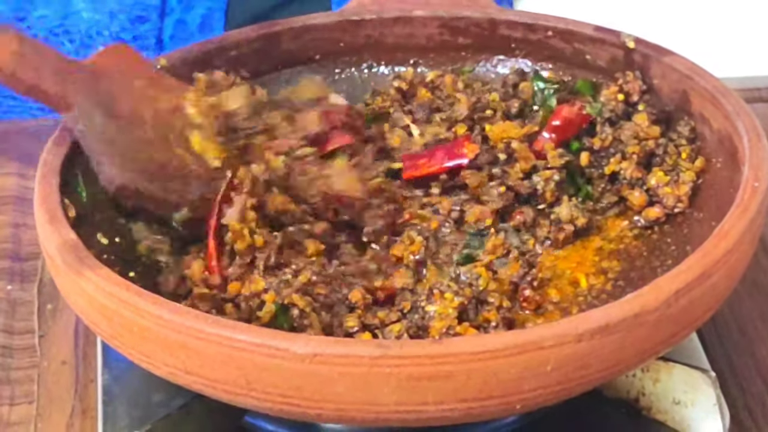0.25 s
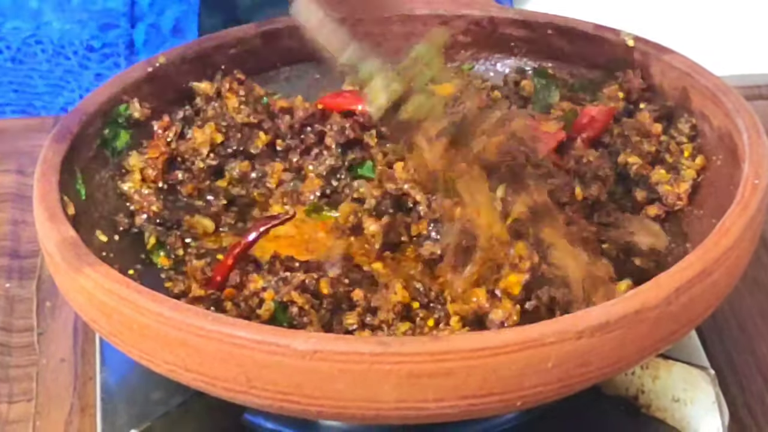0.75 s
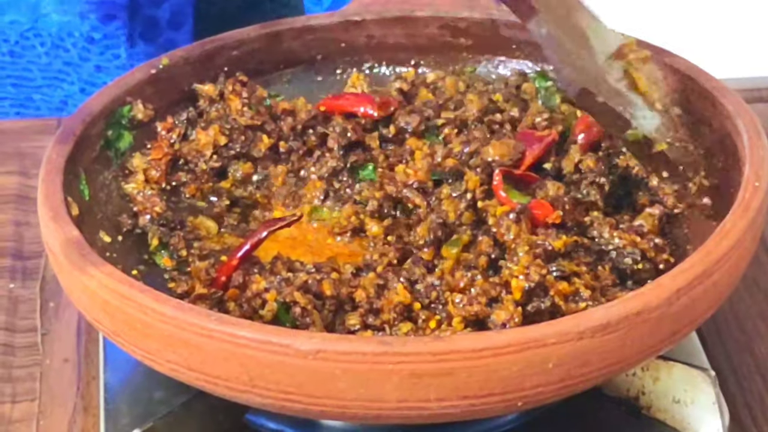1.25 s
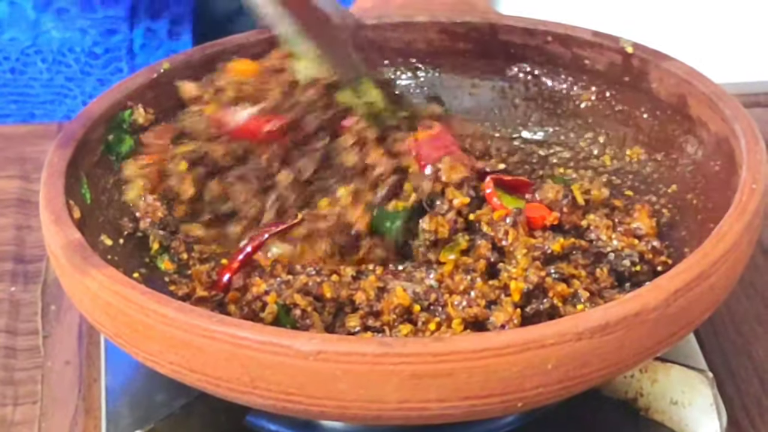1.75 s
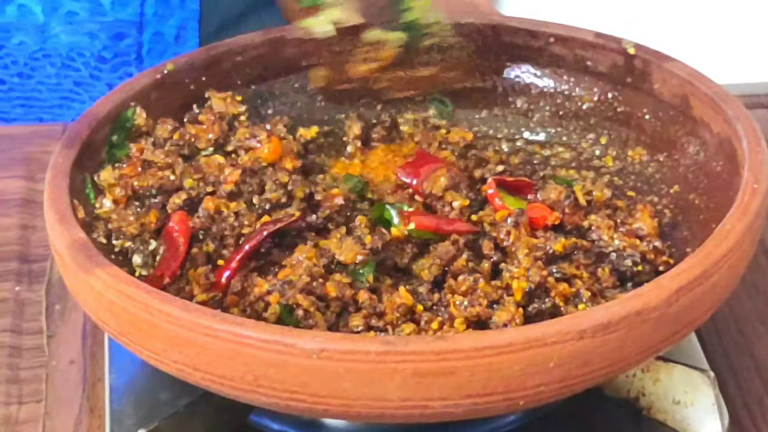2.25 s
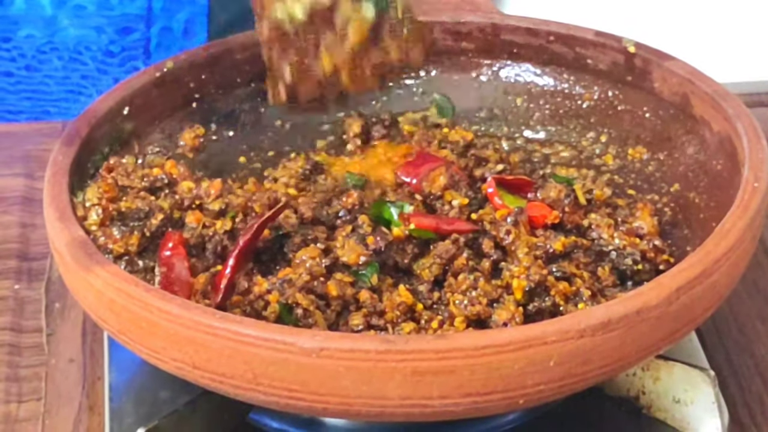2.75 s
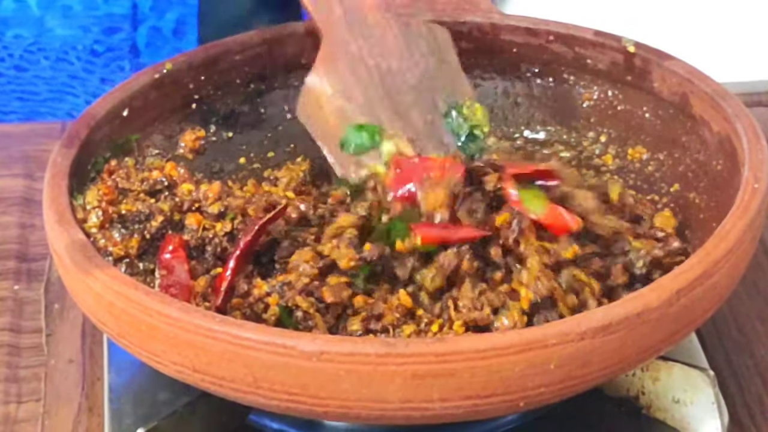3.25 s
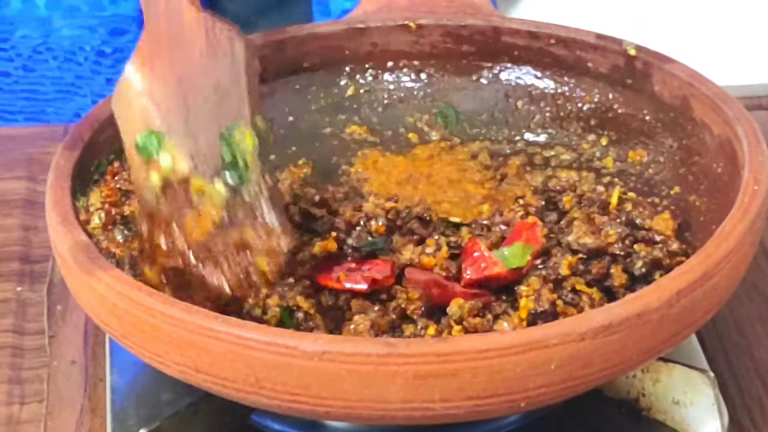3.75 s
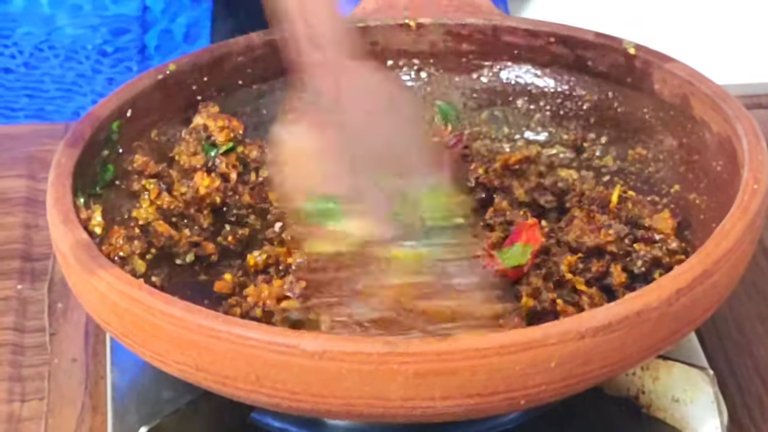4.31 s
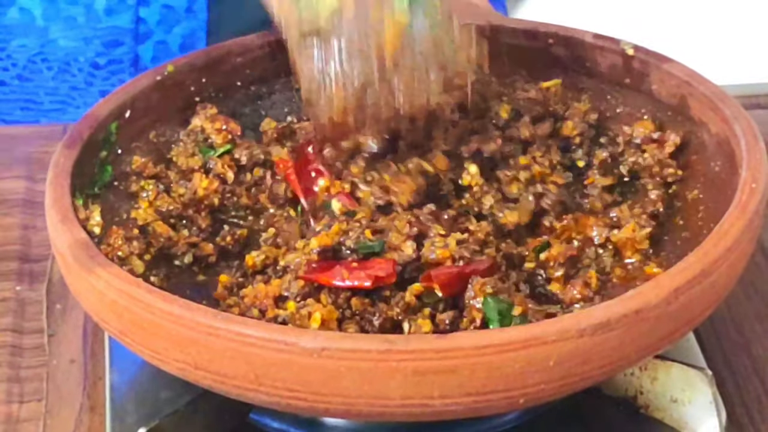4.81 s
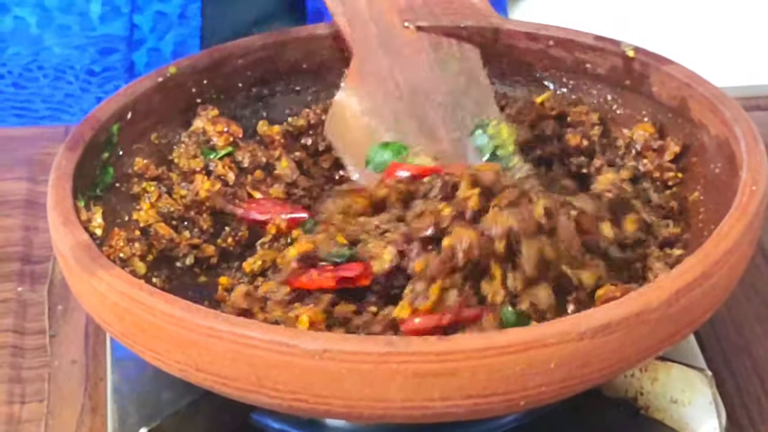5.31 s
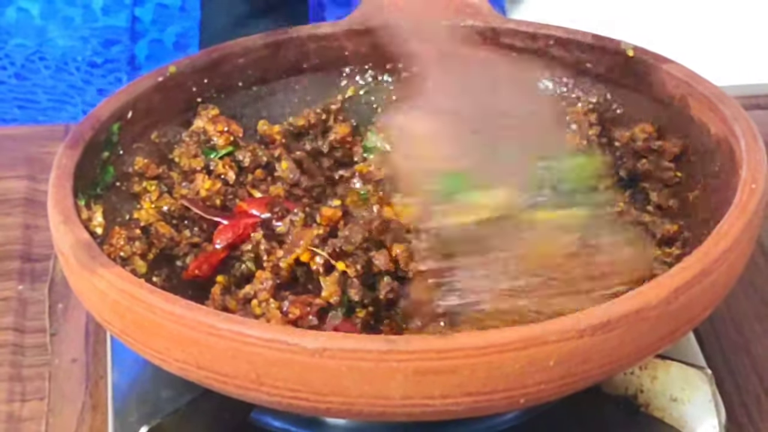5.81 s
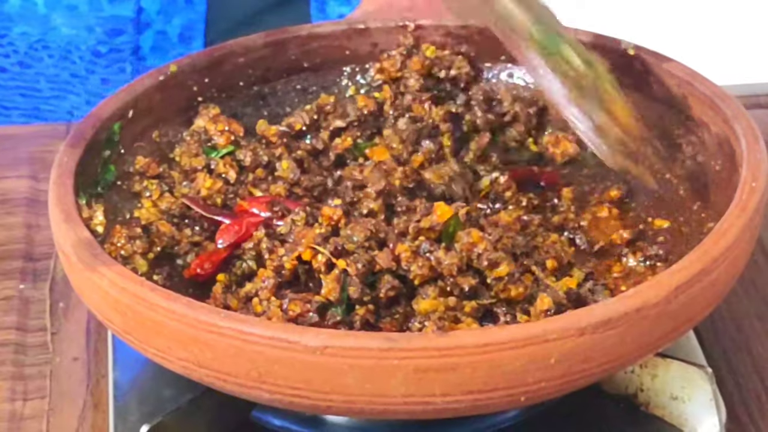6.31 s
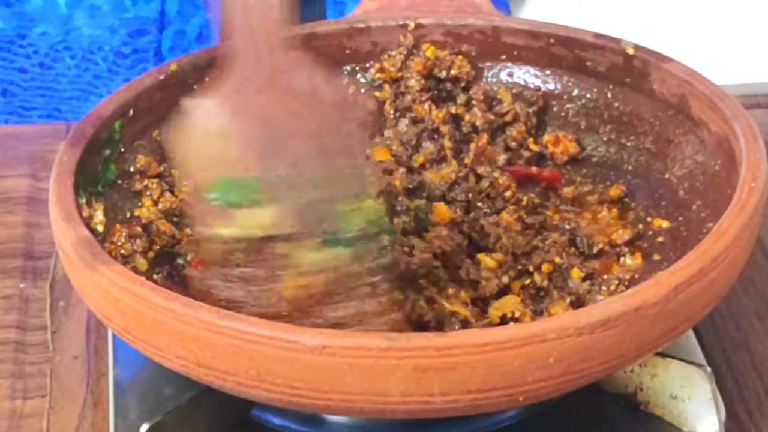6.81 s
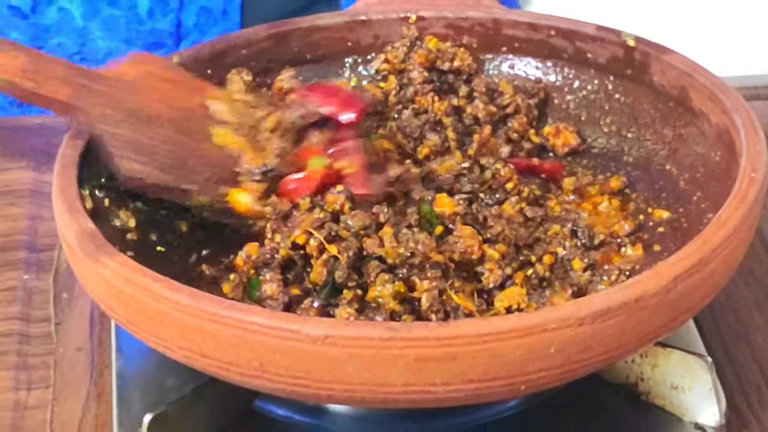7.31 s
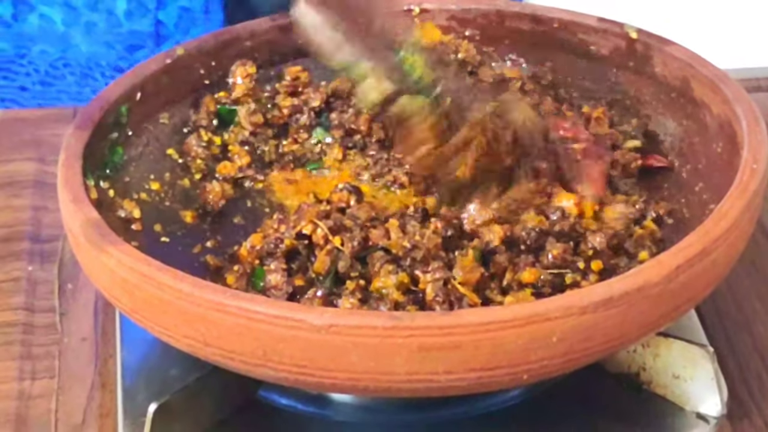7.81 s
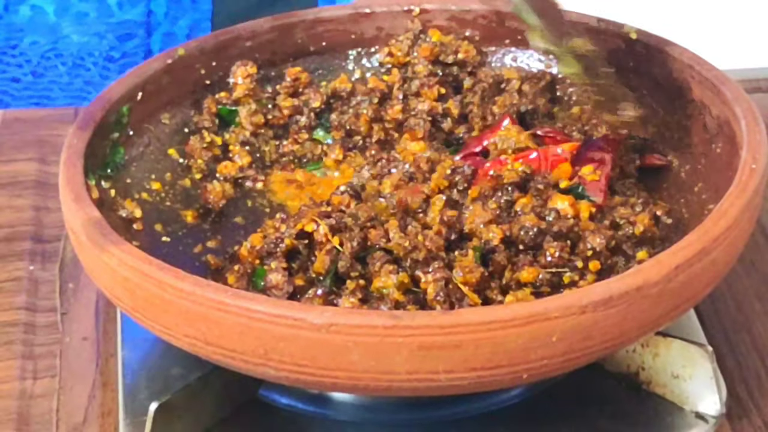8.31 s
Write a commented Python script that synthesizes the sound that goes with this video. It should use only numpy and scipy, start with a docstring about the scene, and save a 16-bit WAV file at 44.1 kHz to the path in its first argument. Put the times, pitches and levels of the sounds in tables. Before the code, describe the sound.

Gritty scraping strokes and hollow knocks of a wooden spatula in a clay pot, with soft frying and small oil spits.

```python
"""An echoing kitchen, where a wooden spatula stirs a thick oily mixture in a clay pot on a stove.
Impacts and stick-slip friction of the blade excite the low modes of the pot and its stand; grit rasps
under the edge, spice cracks and wet heaps squelch. Bursting steam bubbles make the oil sizzle and spit,
and a steam jet whistles faintly over the burner's roar. Two microphone ports hear the treble differently."""
import sys
import numpy as np
from scipy import signal
from scipy.fft import rfft, irfft, next_fast_len
from scipy.io import wavfile
from scipy.ndimage import uniform_filter1d

SR = 44100
rng = np.random.default_rng(int(sys.argv[2]) if len(sys.argv) > 2 else 0)


def generate_wav(signal):
    """Clip the signal to [-1, 1] and save it as 16-bit WAV at the path in sys.argv[1]."""
    frames = np.transpose(np.atleast_2d(signal))
    scaled = np.clip(frames, -1, 1) * 32767
    pcm = np.round(scaled).astype(np.int16)
    wavfile.write(sys.argv[1], SR, pcm)


N = 377182

# spectra of the burner with steady frying, and of oil bubbles: frequency_hz, density_db
BURNER_SPECTRUM = [(12, -38), (20, -5), (42, 2.5), (104, 8), (291, 0), (508, -4.5), (887, -6),
                   (1420, -10.5), (2290, -8.5), (3990, -7), (6240, -13), (8720, -12.5), (11500, -19.5),
                   (14400, -24.5), (15700, -33)]
FRY_SPECTRUM = [(3530, -14.5), (6000, -3.5), (6610, -1.5), (7910, 1.5), (8370, -2), (8790, -2), (9640, -2),
                (12100, -9), (15700, -25)]
# pushes along the clay: start_s, rise_s, hold_s, fall_s, base_db, stand_db, bowl_db, rim_db, wall_db, stove_db
PUSHES = [(0.023, 0.7, 0.057, 0.41, -32.5, -39, -40, -36.5, -33.5, -45.5),
          (0.392, 0.27, 0, 0.036, -50, -37.5, -56, -47, -56, -45),
          (0.509, 0.11, 0.029, 0.29, -46, -40.5, -60, -49, -49, -46),
          (1.384, 0.041, 0, 0.24, -29, -32, -53, -35, -32, -41),
          (1.474, 0.033, 0.059, 0.33, -27, -30, -29.5, -29.5, -36.5, -51),
          (1.664, 0.2, 0.056, 0.055, -26, -34, -30.5, -37, -42, -66.0),
          (1.73, 0.096, 0.04, 0.23, -30.5, -33, -37, -39, -37.5, -42),
          (2.305, 0.015, 0.0026, 0.21, -34, -35.5, -24.5, -33, -29, -40.5),
          (2.441, 0.079, 0.069, 0.11, -28.5, -35, -39, -33.5, -36, -63),
          (2.564, 0.25, 0, 0.25, -38, -43, -46, -41, -42, -54.5),
          (2.862, 0.023, 0, 0.25, -28.5, -36.5, -30, -36, -29.5, -58),
          (2.96, 0.067, 0, 0.23, -66.0, -44.5, -28.5, -40, -41, -44),
          (3.284, 0.25, 0.026, 0.33, -39.5, -38.5, -54, -42.5, -40, -44),
          (3.831, 0.04, 0, 0.15, -27.5, -31, -25.5, -23, -23.5, -39),
          (3.93, 0.097, 0, 0.33, -38, -40, -39.5, -50, -35.5, -48),
          (4.471, 0.081, 0, 0.14, -41, -47, -50, -52, -48, -52),
          (4.602, 0.015, 0, 0.073, -53, -52, -52, -54, -45, -42),
          (4.71, 0.3, 0.016, 0.35, -52, -51, -68, -54, -46, -54),
          (5.22, 0.1, 0.037, 0.26, -42, -40.5, -46, -46.5, -45.5, -41),
          (5.335, 0.073, 0.041, 0.099, -31, -39, -53, -50, -45.5, -45),
          (5.56, 0.86, 0, 0.97, -50, -53, -67, -52, -49.5, -69),
          (6.038, 0.056, 0.064, 0.2, -30.5, -39.5, -35.5, -33, -38, -60),
          (6.176, 0.03, 0, 0.32, -38, -46, -31, -49, -44.5, -54),
          (6.497, 0.031, 0.013, 0.061, -24, -32, -23, -32, -31, -61),
          (6.58, 0.13, 0.069, 0.06, -38, -48, -33.5, -43, -40.5, -54),
          (6.754, 0.35, 0.0034, 0.34, -48, -48, -45, -49, -46.5, -71),
          (6.969, 0.039, 0.034, 0.19, -28.5, -37.5, -29, -38, -33, -40),
          (7.071, 0.01, 0.001, 0.24, -36, -42, -38, -35, -35, -62),
          (7.22, 0.13, 0.12, 0.04, -39, -42.5, -42, -46.5, -54, -52.5),
          (7.433, 0.097, 0, 0.44, -38, -39.5, -50, -44, -44, -48),
          (7.55, 0.12, 0, 0.1, -50, -56, -48, -52, -43, -60),
          (7.638, 0.15, 0.037, 0.11, -50, -43.5, -49, -58, -66.0, -50),
          (8.32, 0.045, 0, 0.2, -32, -32, -30.5, -37, -37.5, -64),
          (8.524, 0.1, 0.0012, 0.04, -24.5, -36, -39, -32.5, -36, -44.5)]
# the same six levels with the blade resting in the mixture: level_db
RESTING_LEVELS = [-65, -73, -66, -68, -61, -69]
# modes of the pot's base, whole bowl, rim and wall, and of stand, stove top and blade:
# frequency_hz, width_hz, gain_db
BASE_MODES = [(288.4, 27, 3.5), (320, 24, -2.5)]
BOWL_MODES = [(351.6, 9.4, -1.5), (374.5, 5.8, -4.5)]
RIM_MODES = [(399.3, 21.3, -4), (436.7, 27, -8.5), (472, 21, -11)]
WALL_MODES = [(560, 460, 1.5), (606, 35, -2), (711.5, 21, -11), (835, 41, -4), (935, 66, -7.5),
              (1031, 41, -4.5), (1204, 110, -3.5)]
STAND_MODES = [(155.7, 12, -6.5), (178.5, 26.5, -4.5), (220.2, 15.5, 3)]
STOVE_MODES = [(102.6, 12.4, 0)]
BLADE_MODES = [(1630, 53, 5.5), (1900, 46, -1), (2140, 64, 3.5), (2620, 71, -4), (3190, 37, -4),
               (3300, 33, 1), (4240, 220, -10)]
# the bowl's note, drifting as the load moves about: time_s, pitch_hz
BOWL_NOTE = [(0, 354), (1.7, 354.3), (2.4, 357), (3.0, 360.8), (3.9, 362), (5.5, 359), (6.15, 378),
             (6.3, 370), (6.55, 361), (7.1, 359.4), (8.55, 362.6)]
# sweeps that bare hot clay: start_s, rise_s, hold_s, fall_s, coarse_db, fine_db, sizzle_db
SWEEPS = [(0.053, 0.17, 0.028, 0.23, -39, -32.5, -40), (0.261, 0.47, 0.021, 0.37, -45.5, -39.5, -47),
          (0.514, 0.215, 0.009, 1.0, -46, -47, -57), (1.518, 0.24, 0.27, 0.315, -45.5, -43, -49),
          (1.956, 1, 0.0035, 1.2, -50, -42.5, -47.5), (2.311, 0.068, 0.012, 0.12, -37, -59, -47),
          (2.411, 0.091, 0.13, 0.39, -47, -41.5, -43), (2.86, 0.018, 0.045, 0.15, -35, -40, -50),
          (3.282, 0.6, 0.038, 0.18, -41, -44.5, -63), (3.442, 0.65, 0.011, 0.2, -49, -46, -47),
          (3.949, 0.35, 0.082, 0.3, -42.5, -40, -47.5), (4.757, 0.56, 0.03, 0.269, -48.0, -42, -50),
          (5.16, 0.21, 0.054, 0.27, -43, -41, -46), (5.19, 0.048, 0.038, 0.23, -60, -61, -41.5),
          (5.285, 0.067, 0.04, 0.33, -38.5, -42, -45.5), (5.593, 0.27, 0.026, 3.5, -54, -59, -50.5),
          (6.064, 0.24, 0.086, 0.21, -43.5, -49, -58), (6.186, 0.55, 0.013, 0.3, -56, -38, -41.5),
          (6.488, 0.066, 0.02, 0.2, -45, -44.5, -46.5), (6.61, 0.019, 0.017, 0.48, -48, -42, -56),
          (6.999, 0.14, 0.019, 0.25, -38.5, -40, -42.5), (7.081, 0.18, 0.12, 0.14, -44.5, -40.5, -57),
          (7.246, 0.6, 0.019, 0.55, -53, -61, -49), (7.48, 0.31, 0.13, 0.64, -44, -43.5, -49.5),
          (7.8, 0.2, 0.023, 0.26, -81, -66, -65), (8.188, 0.28, 0.016, 0.48, -70, -66, -50.5),
          (8.318, 0.03, 0.498, 0.485, -50, -49, -54.5)]
# the same three levels between sweeps: level_db
SETTLING_LEVELS = [-92, -56, -51.5]
# resonances of wood on grit: frequency_hz, width_hz, gain_db
COARSE_MODES = [(1475, 560, 14), (2080, 1170, 12), (2327, 73, 12.5), (2270, 390, 13)]
FINE_MODES = [(2870, 1400, 3.7), (3525, 390, 3.3), (3860, 490, 1.4), (4890, 1060, 3.7), (5530, 890, 1.1)]
# oil droplets: start_s, level_db, pitch_hz, pan_db (twice the left-right difference), relative_snap_db
SPITS = [(0.042, -21, 8750, 5.0, -20), (0.268, -28, 9050, 15, -20), (0.4294, -37, 8690, -3, -14),
         (0.7505, -31, 8500, 3, -3), (0.9363, -26.5, 10600, 5.0, 3), (1.255, -34, 9990, 5, -17),
         (3.4294, -34, 8610, 3.5, -8), (4.7238, -30, 9390, 4.0, -6), (5.176, -31, 8850, 2, -8),
         (5.8958, -28, 7590, -11.5, -34), (6.4894, -37, 9900, 4.0, -6), (6.7633, -31, 10300, 3, -6),
         (7.265, -32, 8860, -2, -8), (7.7533, -28, 10600, 9, -8), (8.192, -34, 9290, 9, -8),
         (8.438, -34, 9570, 4.5, -8)]
# puffs of steam: start_s, rise_s, hold_s, fall_s, level_db
STEAM_PUFFS = [(0.046, 0.014, .01, 0.16, -36.5), (0.268, .012, .004, 0.091, -42),
               (0.422, 0.032, 0.0038, 0.085, -46.5)]
# the blade catching on a ridge: start_s, level_db, pitch_hz
JOLTS = [(0.386, -42, 250), (1.551, -16, 330), (1.68, -22, 345), (1.724, -21, 258), (1.875, -29, 297),
         (2.675, -31.5, 330), (4.603, -39, 400), (6.111, -24, 397), (7.087, -20.5, 370), (7.239, -26, 350),
         (7.463, -28, 293), (8.478, -23, 300)]
# the blade landing on the clay: start_s, level_db, pitch_hz, relative_tick_db, relative_thud_db
KNOCKS = [(1.368, -24.5, 940, -15, 9), (2.293, -9, 935, -3.5, -4.5), (2.851, -13.5, 1010, -0.5, -1),
          (3.814, -6, 960, -13.5, -8), (6.014, -30, 965, -20, 11.5), (6.482, -21.5, 814, -25, 9.5),
          (6.946, -25.5, 915, -15, 7), (8.307, -32, 940, -3, 13)]
# hard bits of spice breaking: start_s, level_db, pitch_hz
CRACKS = [(2.408, -28, 4090), (3.159, -29, 4200), (3.7182, -32, 3570), (3.9863, -34, 2670),
          (4.7995, -31, 4000), (5.342, -29, 2800), (5.566, -35, 3200), (6.6074, -29, 3100),
          (7.65, -33, 1900)]
# wet heaps sliding off the blade: start_s, rise_s, hold_s, fall_s, low_db, high_db
SLIDES = [(3.246, .05, .015, .1, -45, -41), (3.27, .02, 0.051, 0.18, -34, -40.5),
          (5.284, .025, 0.034, 0.092, -33, -37), (7.52, 0.074, .04, 0.11, -44.5, -54)]
# air pockets in those heaps: frequency_hz, width_hz, gain_db
LOW_POCKETS = [(1580, 330, -1), (1850, 280, -1)]
HIGH_POCKETS = [(2250, 550, 0)]
# reverberation time of the kitchen: frequency_hz, t60_s
KITCHEN_DECAY = [(100, 0.25), (350, 0.49), (1000, 0.32), (3000, 0.34), (9000, 0.28)]
# likeness of diffuse sound at the two ports: frequency_hz, coherence
COHERENCE = [(40, 0.044), (120, 0.039), (300, 0.13), (700, 0.13), (2000, 0.14), (8000, 0.011)]
# response curve of which each port takes its own share: frequency_hz, gain_db
PORT_CURVE = [(60, 2), (300, -2.5), (900, -1.5), (2500, 1), (4000, 2.5), (6000, -1.5), (7400, -12),
              (8100, 2.5), (8650, 15), (9400, 11), (10800, 12), (13000, -1.5), (15000, 7)]


def gain_of(db):
    """Amplitude ratio of a level in decibels."""
    return 10 ** (np.asarray(db) / 20)


def unit_rms(x):
    """The signal scaled to unit mean power."""
    return x / np.sqrt(np.mean(x ** 2) + 1e-20)


def curve_at(points, hz):
    """Interpolation on a logarithmic frequency axis."""
    frequencies, values = np.transpose(points)
    return np.interp(np.log(hz + 1), np.log(frequencies + 1), values)


def coloured(x, points, share=1):
    """Zero-phase filtering by a share of a decibel curve."""
    size = next_fast_len(N)
    response = gain_of(share * curve_at(points, np.fft.rfftfreq(size, 1 / SR)))
    return irfft(rfft(x, size) * response, size)[..., :N]


def burst(s, db, hz, cycles):
    """A Gaussian wave packet with its crest at s: the fewer the cycles, the wider the band."""
    out, t = np.zeros(N), np.arange(-300, 300) / SR
    part = out[round(s * SR) - 300:][:600]
    part += (gain_of(db) * np.exp(-(t * hz / cycles) ** 2) * np.cos(2 * np.pi * hz * t))[:len(part)]
    return out


def ring(x, modes):
    """Modal superposition: two-pole resonators summed with alternating sign."""
    out, x = np.zeros(x.shape), x + 1e-15 * np.cos(np.arange(N))  # guards against underflow
    for k, (hz, width, db) in enumerate(modes):
        resonator = signal.iirpeak(hz, hz / width, SR)
        out += (-1) ** k * gain_of(db) * signal.lfilter(*resonator, x) / np.sqrt(width)
    return out


def driven(force, db, modes, soft_hz):
    """Forced vibration: a soft contact drives the modes only weakly above soft_hz."""
    contact = signal.butter(2, [0.61 * modes[0][0], soft_hz], "bandpass", fs=SR, output="sos")
    force = signal.sosfilt(contact, force)
    return ring(force * gain_of(db), modes) / ring(force[0], modes).std()


def impulses(per_s, spread_db):
    """A Poisson train of tiny impulses of either sign, a few of them larger."""
    out, at = np.zeros(N), np.flatnonzero(rng.random(N) < per_s / SR)
    size, side = rng.random((N // 4, 2)).T
    level_db = spread_db * np.minimum(-np.log(size + 1e-9), 4)
    out[at] = (gain_of(level_db) * np.sign(side - .5))[:len(at)]
    return unit_rms(out)


def impulse_pair(per_s, spread_db, shared):
    """Partial coherence: the ports share part of the power, and the rest arrives by other paths."""
    common = impulses(per_s, spread_db)
    own = np.array([impulses(per_s, spread_db) for port in range(2)])
    return np.sqrt(shared) * np.array([np.roll(common, 2), common]) + np.sqrt(1 - shared) * own


def gesture_levels(rows, rest_db):
    """Incoherent powers add, giving each layer's dB. Holds begin at start_s; rise and fall span 20 dB."""
    rows, t = np.array(rows), np.arange(0, N / SR + .002, .002)
    start, rise, hold, fall = rows[:, :4].T[:, :, None]
    before = np.maximum(start - t, 0) / (rise + 1e-3)
    after = np.maximum(t - start - hold, 0) / (fall + 1e-3)
    power = gain_of(rows[:, 4:].T) ** 2 @ gain_of(-20 * (before + after)) ** 2
    power += gain_of(rest_db)[:, None] ** 2
    return [np.interp(np.arange(N) / SR, t, 10 * np.log10(layer)) for layer in power]


def touching():
    """Friction needs contact: this gain drops to zero while the blade is in the air before a knock."""
    gain, before = np.ones(N), np.arange(SR // 10, 0, -1) / SR
    for s, *_ in KNOCKS:
        gain[round(s * SR) - len(before):round(s * SR)] = 1 - np.exp(-(before / 0.033) ** 4)
    return gain


def flutter(depth_db, memory_s):
    """Random amplitude modulation with an exponentially fading correlation."""
    step_s = .01
    steps = rng.standard_normal(round(N / SR / step_s) + 2)
    wobble = unit_rms(signal.lfilter([1], [1, -np.exp(-step_s / memory_s)], steps))
    return gain_of(depth_db * np.interp(np.arange(N) / SR / step_s, np.arange(len(steps)), wobble))


def burner(level_db=-43):
    """Burner roar and steady frying: diffuse broadband noise whose spectrum wavers in patches."""
    frames, hz = N // 256 + 5, np.fft.rfftfreq(1024, 1 / SR)
    left_re, left_im, own_re, own_im, patches = rng.standard_normal((frames, 513, 5)).T
    patches = unit_rms(uniform_filter1d(uniform_filter1d(patches, size=18, axis=0), size=6, axis=1))
    left, own = left_re + 1j * left_im, own_re + 1j * own_im
    coherence = curve_at(COHERENCE, hz)[:, None]
    spectra = np.array([left, coherence * left + np.sqrt(1 - coherence ** 2) * own])
    depth_db = 3.74 * hz / (hz + 300)
    spectra *= gain_of(curve_at(BURNER_SPECTRUM, hz)[:, None] + patches * depth_db[:, None])
    return gain_of(level_db) * unit_rms(signal.istft(spectra, nperseg=1024, noverlap=768)[1][:, :N])


def blade_drag():
    """Stick-slip friction on clay: where and how the blade presses decides which modes hum."""
    base_db, stand_db, bowl_db, rim_db, wall_db, stove_db = gesture_levels(PUSHES, RESTING_LEVELS)
    judder = touching() * impulse_pair(per_s=600, spread_db=0.5, shared=0.97)
    chatter = touching() * impulse_pair(per_s=900, spread_db=1.5, shared=0.34)
    stand = driven(judder, stand_db, STAND_MODES, soft_hz=246)
    stove = driven(judder, stove_db, STOVE_MODES, soft_hz=154)
    base = driven(judder, base_db, BASE_MODES, soft_hz=390)
    rim = driven(judder, rim_db, RIM_MODES, soft_hz=560)
    wall = driven(chatter, wall_db, WALL_MODES, soft_hz=1080)
    return stand - stove + base - bowl_hum(judder, bowl_db) + rim + wall


def bowl_hum(force, db, width_hz=7.8):
    """A resonance tuned by the moving load: the force is shifted to 0 Hz, smoothed and shifted back."""
    pitch_hz = np.interp(np.arange(N) / SR, *np.transpose(BOWL_NOTE))
    carrier = np.exp(2j * np.pi * np.cumsum(pitch_hz) / SR)
    pole = np.exp(-np.pi * width_hz / SR)
    note = (carrier * signal.lfilter([1], [1, -pole], force * gain_of(db) / carrier)).real
    return note * np.sqrt(2 * (1 - pole ** 2)) / force.std()


def grit_rasp():
    """Granular friction: grit crumbles unevenly under the edge; the finest trickles on as it lifts."""
    coarse_db, fine_db, _ = gesture_levels(SWEEPS, SETTLING_LEVELS)
    fine = flutter(1.6, memory_s=0.01) * impulse_pair(per_s=6000, spread_db=1.5, shared=0.042)
    coarse = touching() * impulse_pair(per_s=1200, spread_db=4, shared=0.12)
    return (driven(coarse, coarse_db, COARSE_MODES, soft_hz=3230)
            + driven(fine, fine_db, FINE_MODES, soft_hz=12000))


def sizzle():
    """Shot noise: thousands of steam bubbles burst in the oil in clumps, with sparse larger ones."""
    *_, sizzle_db = gesture_levels(SWEEPS, SETTLING_LEVELS)
    clumps = flutter(1.2, memory_s=0.024) * flutter(0.51, memory_s=0.043)
    small = clumps * impulse_pair(per_s=4000, spread_db=0.5, shared=0.024)
    large = gain_of(-17) * impulse_pair(per_s=160, spread_db=6, shared=0.46)
    return gain_of(sizzle_db) * unit_rms(coloured(small + large, FRY_SPECTRUM))


def oil_spits(fizz_db=-23.5, fizz_fall_db_per_s=700):
    """A popping droplet radiates a bright transient in a puff of noise, then a decaying fizz."""
    out, t = np.zeros((2, N)), np.arange(-400, 4000) / SR
    puff = gain_of(-19) * np.exp(-((t - .001) / 0.0032) ** 2)
    fizz = gain_of(fizz_db - fizz_fall_db_per_s * t) * (t > 0)
    spray = unit_rms(coloured(rng.standard_normal(N), FRY_SPECTRUM))
    for s, db, hz, pan_db, snap_db in SPITS:
        pop = burst(s + .001, db - 4.5, hz, cycles=3.7)
        at = round(s * SR) - 400
        pop[at:at + len(t)] += gain_of(db) * (puff + fizz) * spray[at:at + len(t)]
        pop += burst(s + 0.0011, db + snap_db, 11000, cycles=0.46)
        pop -= burst(s + 0.00093, db + snap_db - 16, 4200, cycles=1)
        out += pop * gain_of([[pan_db / 4], [-pan_db / 4]])
    return out


def steam_jet(pitch_hz=8690, width_hz=220):
    """A narrow resonance filters the noise of escaping steam into a faint whistle."""
    whistle = ring(impulse_pair(per_s=1000, spread_db=2, shared=.05), [(pitch_hz, width_hz, 0)])
    return gain_of(gesture_levels(STEAM_PUFFS, [-90])[0]) * unit_rms(whistle)


def blade_impacts():
    """Impact sets pot and blade in free vibration; a jolt on a ridge is a soft bump with no tap."""
    jolts = sum(burst(s, db, hz, cycles=1.08) for s, db, hz in JOLTS)
    tap, tick, thud = np.zeros((3, N))
    for s, db, hz, tick_db, thud_db in KNOCKS:
        tap += burst(s + 0.00203, db, hz, cycles=0.65)
        tick += burst(s + 0.001086, db + tick_db, 2850, cycles=0.16)
        thud += burst(s + 0.0032, db + thud_db, 330, cycles=0.27)
    pot = gain_of(23) * ring(thud + gain_of(-12) * jolts, BASE_MODES + BOWL_MODES + RIM_MODES)
    wall = gain_of(17) * ring(tap, WALL_MODES)
    blade = gain_of(31) * ring(tick, BLADE_MODES)
    return tap + jolts + gain_of(-5) * tick + pot + wall + blade


def spice_cracks():
    """Brittle fracture: a hard bit of spice gives a snap and a weaker one just after."""
    return sum(burst(s + 0.00113, db, hz, cycles=2.4) + burst(s + 0.0039, db - 7, 1.11 * hz, cycles=2.5)
               for s, db, hz in CRACKS)


def wet_slides():
    """Air pockets of similar size resonate in narrow bands, so a sliding heap squelches."""
    squelch, out = impulse_pair(per_s=900, spread_db=3.5, shared=0.38), 0
    for db, modes in zip(gesture_levels(SLIDES, [-90, -90]), (LOW_POCKETS, HIGH_POCKETS)):
        pockets = sum(ring(ring(squelch, [mode]), [mode]) for mode in modes)
        out += gain_of(db) * unit_rms(pockets)
    return out


def kitchen_echo(x):
    """Reverberation: sparse reflections, partly coherent at the ports, each band with its own decay."""
    taps = np.zeros((2, SR))
    at = np.arange(160, SR - 20, 20) + rng.integers(0, 20, (2, (SR - 161) // 20))
    np.put_along_axis(taps, at, rng.choice([-1., 1.], at.shape), 1)
    spectra = rfft(taps)
    coherence = curve_at(COHERENCE, np.fft.rfftfreq(SR, 1 / SR))
    spectra[1] = coherence * spectra[0] + np.sqrt(1 - coherence ** 2) * spectra[1]
    hz, t, bands = signal.stft(irfft(spectra), SR, nperseg=256)
    decay = gain_of(-60 * t / curve_at(KITCHEN_DECAY, hz)[:, None])
    tail = signal.istft(bands * decay, SR, nperseg=256)[1]
    tail /= np.linalg.norm(tail, axis=1, keepdims=True)
    return signal.fftconvolve(x[None], tail, axes=1)[:, :N]


def scene():
    """Superposition of direct sound, reverberation and the burner at the two ports."""
    stirring = blade_drag() + grit_rasp() + wet_slides() + sizzle() + steam_jet()
    hits = blade_impacts() + spice_cracks()
    spits = oil_spits()
    into_room = gain_of(-5.5) * hits + gain_of(-2) * spits.mean(0) + gain_of(-11.5) * stirring.mean(0)
    direct_hits = np.array([np.roll(hits, 2), hits])  # the left port is farther
    return direct_hits + stirring + spits + kitchen_echo(into_room) + burner()


def record(dry):
    """Each port has its own frequency response; a steep low-pass limits the band of both."""
    left = coloured(dry[0], PORT_CURVE, share=0.51)
    right = coloured(dry[1], PORT_CURVE, share=-0.16)
    low_pass = signal.firwin(1023, cutoff=15780, window=("kaiser", 10), fs=SR)
    return signal.oaconvolve(np.array([left, right]), low_pass[None], "same")


dry = scene()
out = record(dry)
generate_wav(out)
```